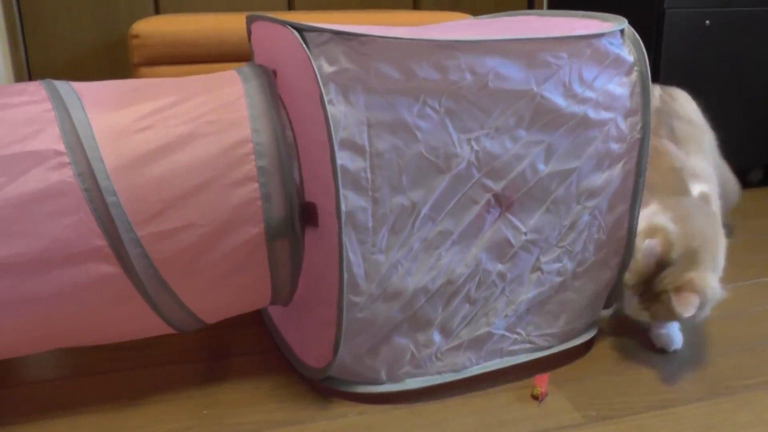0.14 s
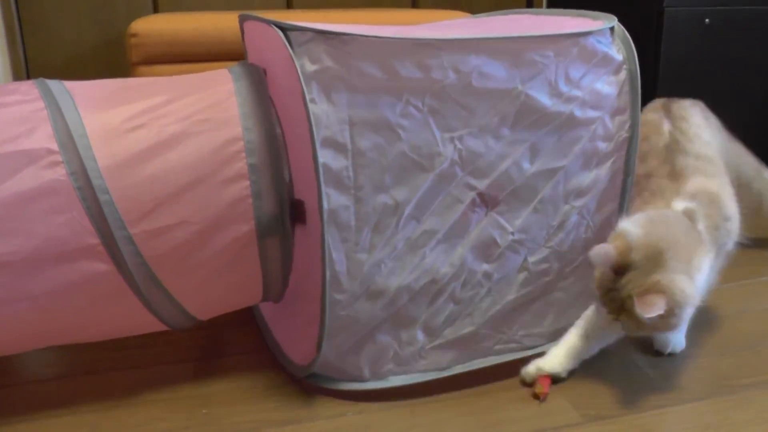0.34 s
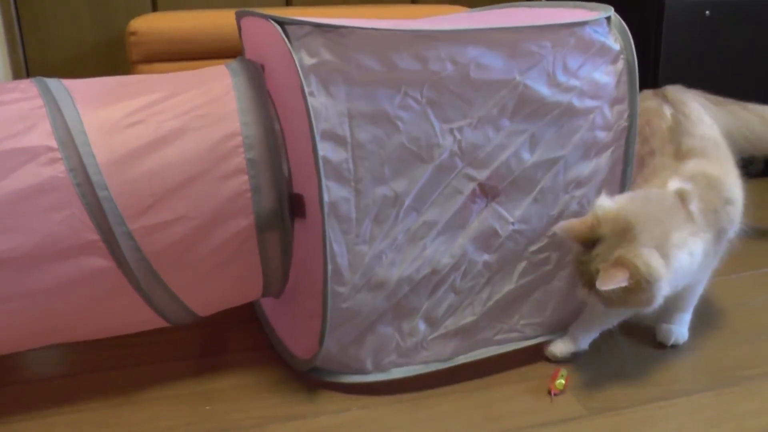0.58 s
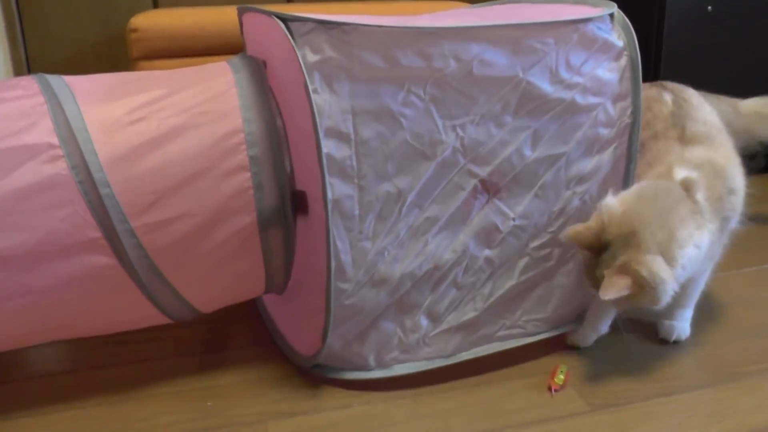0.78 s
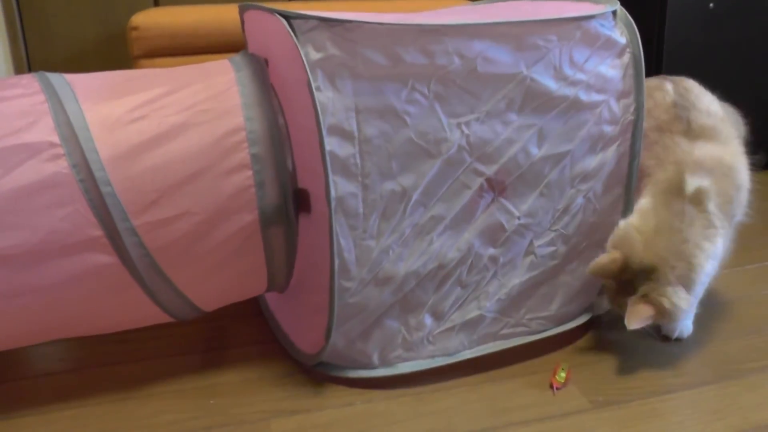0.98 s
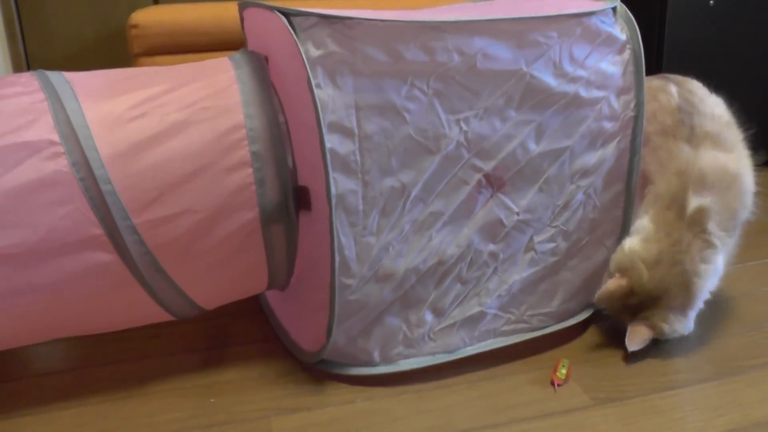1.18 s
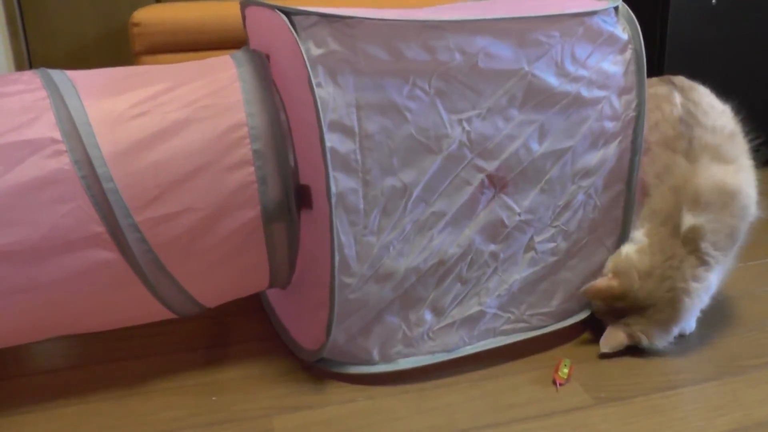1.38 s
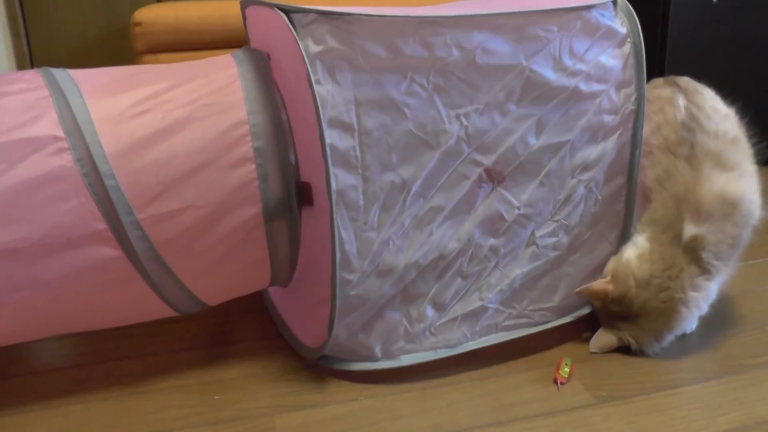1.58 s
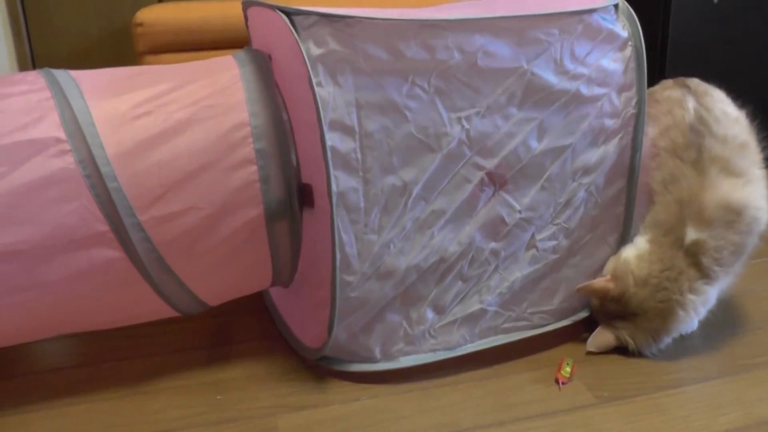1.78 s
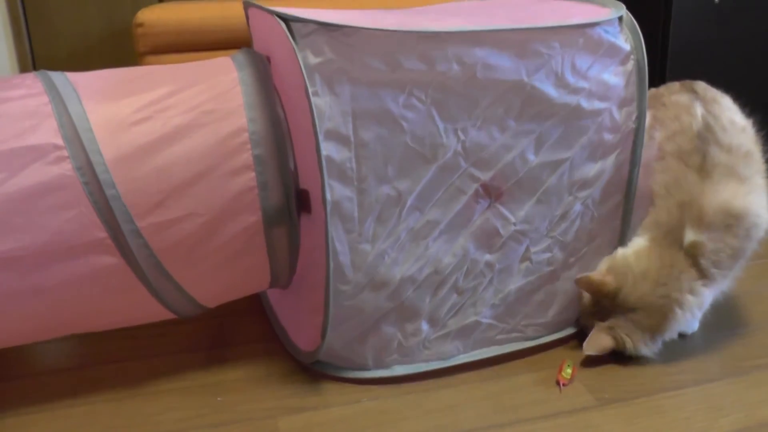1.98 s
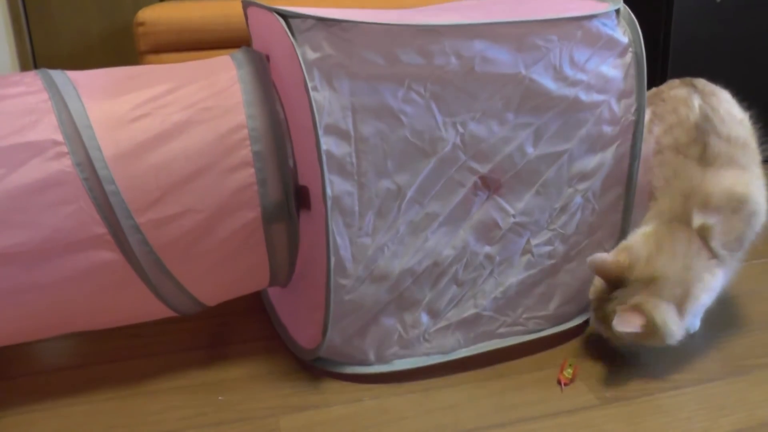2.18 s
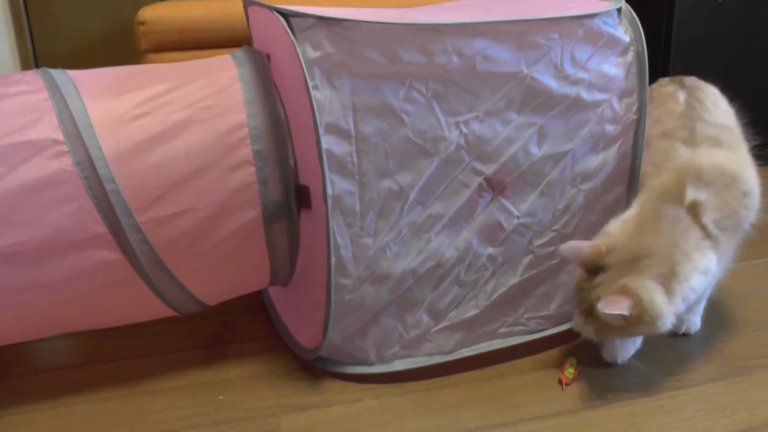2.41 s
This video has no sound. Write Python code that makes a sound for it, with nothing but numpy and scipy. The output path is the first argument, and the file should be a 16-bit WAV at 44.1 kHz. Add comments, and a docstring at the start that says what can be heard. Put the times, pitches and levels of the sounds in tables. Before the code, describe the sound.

A cat jostles a fabric play cube, heard close by. At about 0.2 seconds, fur and a paw swish across the cloth with a brief, ringing scrape. From 0.4 seconds the cube knocks quickly and unevenly on floorboards, loudest at first and fading by 1.3, with tiny cloth snaps. Two faint taps and softer swishes come between 1.7 and 2.4 seconds. The quiet room hums faintly throughout.

```python
"""A swish of fur on cloth, then wooden knocks: a cat brushes past a thin fabric play cube.
The first stroke sets two cloth panels singing; a paw jolts the cube, whose frame knocks and
rocks on the floorboards. The taut cloth snaps lightly, and softer swishes follow near the end.
Heard from close by on a stereo microphone, in a quiet room with a faint hum."""
import sys
import numpy as np
from scipy import signal
from scipy.fft import rfft, irfft
from scipy.io import wavfile
from scipy.ndimage import uniform_filter1d

SR = 44100
rng = np.random.default_rng(int(sys.argv[2]) if len(sys.argv) > 2 else 0)


def transcribe(signal):
    """Save signal, clipped to [-1, 1], as a 16-bit WAV file at the path in sys.argv[1]."""
    frames = np.atleast_2d(signal).T
    limited = np.clip(frames, -1, 1)
    pcm = np.round(limited * 32767).astype(np.int16)
    wavfile.write(sys.argv[1], SR, pcm)


N = 108045

# frame on the floor: t/s, relative level/dB at each of KNOCK_COLOUR_HZ, relative tick level/dB
KNOCKS = [(0.358, -56, -42.5, -58, -55, -62, -34.5, -65), (0.387, -44, -46, -45, -62, -63, -29.5, -77),
          (0.4376, -28, -31.5, -17.5, -33.5, -40.5, -45, -54), (0.464, -40.5, -38, -55, -45, -61, -54, -79),
          (0.533, -32.5, -47, -37, -57, -72, -39.5, -68), (0.543, -34, -50, -42, -50, -60, -50, -79),
          (0.591, -30, -35, -32.5, -31.5, -47.5, -33, -58),
          (0.6808, -34, -33.5, -33.5, -35.5, -38.5, -45, -51),
          (0.694, -32, -35, -28, -35.5, -44, -40.5, -59), (0.706, -34, -36, -41.5, -36.5, -71, -53, -85),
          (0.717, -46, -37.5, -63, -68, -54, -45.5, -72), (0.795, -37, -37.5, -36, -49, -61, -39, -74),
          (0.8569, -31.5, -38.5, -36.5, -35.5, -45, -49, -62.5),
          (0.867, -37, -47, -40, -44.5, -68, -46, -83), (0.925, -43, -43.5, -56, -52, -72, -47, -76),
          (0.963, -34, -42.5, -39.5, -48.5, -58, -50, -64), (0.986, -49, -58, -35.5, -44, -53.5, -55, -63),
          (1.03, -46, -47, -55, -66, -65, -62, -71), (1.070, -36, -51, -43, -49.5, -70, -57, -85),
          (1.117, -55, -70, -79, -67, -73, -60, -84), (1.162, -44, -56.5, -46, -62, -70, -60, -72),
          (1.207, -50, -60, -54, -92, -70, -47, -77), (1.245, -51, -48.5, -50, -65, -66, -67, -79),
          (1.307, -53.5, -64, -49.5, -68, -80, -70, -91), (1.34, -61.5, -83, -49.5, -79, -86, -70, -98),
          (1.746, -75, -66, -53.5, -63, -79, -60, -83), (2.056, -62, -58, -54, -54.5, -72, -65, -80)]
# points that shape a knock's spectrum: f/Hz
KNOCK_COLOUR_HZ = [520, 320, 760, 1150, 1900, 190]
# floorboard modes: f/Hz, gain/dB, t60/s
BOARD_MODES = [(183.3, -12, 0.23), (220, -12.5, 0.064), (321.7, 2, 0.19), (370.4, -9.5, 0.21),
               (480, -2.5, 0.062), (528.5, -1, 0.072), (575.5, -11, 0.29), (692, -1.5, 0.065),
               (771, -4.5, 0.053), (837.6, -5.5, 0.13), (1046, -8, 0.16), (1089, -4.5, 0.11),
               (1169, -3, 0.081), (1207, -3, 0.11), (1437, -5.5, 0.046), (1600, -5, 0.031),
               (1674, -8.5, 0.15), (1916, 0.5, 0.06), (2007, -2, 0.041), (2185, -9.5, 0.059),
               (2600, -8.5, 0.017), (3225, -9.5, 0.034)]
# stereo width of the knocks: f/Hz, side against mid/dB
KNOCK_WIDTH = [(250, -20), (700, -14), (1200, -6), (2400, -10), (8000, -4)]
# low, middle, high and top bands of the cloth: lower f/Hz, upper f/Hz
CLOTH_BANDS = [(300, 900), (900, 2400), (2500, 7500), (8000, 15000)]
# left-right likeness of each cloth band
CLOTH_LIKENESS = [0.88, 0.8, 0.7, 0.3]
# fur on cloth, one list a stroke: t/s, level/dB in each cloth band
SWISHES = [
    [(0.18, -82, -74, -73, -85), (0.197, -72, -56.5, -57, -60), (0.215, -55.5, -50, -51.5, -55),
     (0.243, -56, -54.5, -52, -50.5), (0.265, -51, -55, -58, -52.5), (0.338, -61.5, -66, -67, -52.5),
     (0.38, -60, -68, -68, -85)],
    [(1.84, -89, -96, -103, -76), (1.898, -82, -78, -74.5, -65.5), (2.05, -58.5, -63, -66, -55.5),
     (2.24, -90, -90, -82.5, -75.5)],
    [(2.26, -68, -97, -91, -92), (2.292, -89, -69.5, -71, -84), (2.336, -71, -66.5, -75, -73),
     (2.4, -83, -105, -100, -97)],
]
# rustle as the cube rocks: t/s, high band level/dB, top band level/dB
RUSTLE = [(0.381, -69.5, -67), (0.59, -81.5, -71.5), (0.884, -76, -68), (1.168, -82.5, -74),
          (1.648, -84.5, -75.5), (1.84, -96, -81)]
# cloth panel resonances: f/Hz, width/Hz
PANELS = [(1160, 110), (1930, 130)]
# paw scraping the panels: t/s, lower panel level/dB, upper panel level/dB
SCRAPE = [(.183, -86, -75), (0.201, -57, -50.5), (0.214, -50, -50.5), (.23, -43.5, -51),
          (0.256, -57.5, -57), (0.349, -64, -85)]
# cloth snaps: t/s, relative level/dB, f/Hz
SNAPS = [(0.3643, -40, 6860), (0.8388, -49.5, 6600), (1.2173, -55, 4000), (2.172, -49, 7900)]
# reverberation of the room: f/Hz, t60/s
ROOM_DECAY = [(250, 0.27), (800, 0.35), (2000, 0.39), (6000, 0.2)]
# room tone spectrum: f/Hz, relative level/dB
TONE_SPECTRUM = [(30, -3), (74, -10), (146, 4), (240, -6), (303, -0.5), (350, -3.5), (694, -8), (1390, -16),
                 (1720, -14), (2430, -25.5), (3500, -28), (5000, -29), (9000, -24.5), (15600, -20)]
# swell of the low room tone: t/s, gain/dB
TONE_SWELL = [(0, 2), (.15, 6.5), (.5, -1.5), (1.5, -0.2), (2.1, -0.5), (2.45, -3)]
# stereo image of the room tone: f/Hz, left-right likeness
TONE_LIKENESS = [(60, 0.93), (180, 0.85), (550, 0.66), (1650, 0.97), (4970, 0.91), (15000, 0.042)]
# microphone housing: f/Hz, gain/dB
MIC_RESPONSE = [(3000, 1.07), (4000, 1), (4450, -2.5), (5300, 3.5), (6800, 3.5), (7650, -10.5),
                (8600, -2.5), (12500, -5.5), (15600, -14)]
# microphone port balance: f/Hz, left minus right/dB
MIC_BALANCE = [(60, 0), (1500, 0), (15000, -1)]

RISE_CYCLES, SCATTER_DB, DETUNE = 1.8, 2.0, 0.007  # a mode's build-up; its spread from knock to knock
THUD_SHARE, THUD_T60_CYCLES = 0.57, 32.3  # the part of each mode that the resting frame damps
CHATTER_DEPTH, CHATTER_S = 0.45, 0.016  # the loose frame roughens each ring
TICK_GAIN_DB, TICK_T60_S, TICK_SPLIT_HZ = 4, 0.038, 9300
GRAINS_PER_S, GRAIN_SPREAD_DB, GRAIN_SHARE = 3000, 3.5, 0.49
SNAP_REACH_HZ, SNAP_T60_S = 3000, 0.028
REVERB_DB, TONE_DB, HUM_DB = -5.5, -62.5, -72
MIC_LIMIT_HZ = 15700


def frame_knocks():
    """Each knock rings the boards with its own colour, damped at first and roughened, plus a bright tick."""
    out, t = np.zeros((2, N)), np.arange(SR // 4) / SR
    hz, mode_db, t60 = np.transpose(BOARD_MODES)[:, :, None]
    steps = np.arange(int(t[-1] / CHATTER_S) + 2) * CHATTER_S
    sides = np.array([[1], [-1]])
    for start, *colour_db, tick_db in KNOCKS:
        scatter, detune, phase, side_phase = rng.standard_normal((4, len(hz), 1))
        noise = rng.standard_normal((2, 2000))
        shake = np.array([np.interp(t, steps, row) for row in rng.standard_normal((len(hz), len(steps)))])
        level_db = at_hz(sorted(zip(KNOCK_COLOUR_HZ, colour_db)), hz) + mode_db + SCATTER_DB * scatter
        rise = np.sin(np.pi / 2 * np.minimum(t * hz / RISE_CYCLES, 1)) ** 2
        thud = THUD_SHARE * gain_of(-60 * t * hz / THUD_T60_CYCLES)
        ring = (1 - THUD_SHARE) * gain_of(-60 * t / t60)
        chatter = 1 + CHATTER_DEPTH * np.minimum(t / CHATTER_S / 2, 1) * shake
        envelope = gain_of(level_db) * rise * (thud + ring) * chatter
        angle = 2 * np.pi * (hz * (1 + DETUNE * detune) * t + phase)
        mid = envelope * np.sin(angle)
        side = envelope * gain_of(at_hz(KNOCK_WIDTH, hz)) * np.sin(angle + 2 * np.pi * side_phase)
        add(out, start, mid.sum(0) + sides * side.sum(0))
        tick = unit_rms(band(noise, 2040, TICK_SPLIT_HZ) + 0.67 * band(noise, TICK_SPLIT_HZ, 21000))
        tick *= gain_of(tick_db + TICK_GAIN_DB - 60 * t[:2000] / TICK_T60_S)
        add(out, start, tick[0] + sides * gain_of(KNOCK_WIDTH[-1][1]) * tick[1])
    return out


def cloth_swishes():
    """Fur rubs the cloth: dense fibre grains over smooth hiss, in four bands that follow the strokes."""
    out = np.zeros((2, N))
    sizes = gain_of(GRAIN_SPREAD_DB * np.minimum(rng.exponential(1, N), 5))
    catches = rng.random(N) < GRAINS_PER_S / SR
    grains = unit_rms(sizes * catches) * rng.choice([-1., 1.], (2, N))
    friction = GRAIN_SHARE * grains + (1 - GRAIN_SHARE) * rng.standard_normal((2, N))
    for k, (lo_hz, hi_hz) in enumerate(CLOTH_BANDS):
        envelope = sum(contour(stroke, k + 1) for stroke in SWISHES)
        if k > 1:  # only the upper two bands rustle
            envelope += contour(RUSTLE, k - 1)
        out += envelope * unit_rms(band(stereo(*friction, CLOTH_LIKENESS[k]), lo_hz, hi_hz))
    return out


def paw_scrape():
    """The first stroke sets two panels of the cloth singing."""
    return sum(contour(SCRAPE, k + 1) * resonant_noise(hz, width_hz, CLOTH_LIKENESS[1])
               for k, (hz, width_hz) in enumerate(PANELS))


def cloth_snaps():
    """The taut cloth gives tiny bright snaps, each a fast-dying burst of noise."""
    out, t = np.zeros(N), np.arange(1500) / SR
    for start, db, hz in SNAPS:
        noise = band(rng.standard_normal(len(t)), hz - SNAP_REACH_HZ / 2, hz + SNAP_REACH_HZ)
        add(out, start, gain_of(db - 10.5 - 60 * t / SNAP_T60_S) * unit_rms(noise))
    return out


def room_reverb(x):
    """Sparse reflections come back to the microphone, each band dying at its own speed."""
    taps = np.zeros((2, SR // 2))
    slots = np.arange(200, SR // 2 - 20, 20)
    delays = slots + rng.integers(0, 20, (2, len(slots)))
    np.put_along_axis(taps, delays, rng.choice([-1., 1.], delays.shape), 1)
    hz, t, spectra = signal.stft(stereo(*taps, likeness=0.93), SR, nperseg=256)
    decay = gain_of(-60 * t / at_hz(ROOM_DECAY, hz)[:, None])
    tail = signal.istft(spectra * decay, SR, nperseg=256)[1]
    tail /= np.linalg.norm(tail[0])
    return gain_of(REVERB_DB) * signal.fftconvolve(x[None], tail, axes=1)[:, :N]


def room_tone():
    """The quiet room behind the cat: slightly patchy noise whose low part swells slowly."""
    frames, hz = N // 256 + 5, np.fft.rfftfreq(1024, 1 / SR)[:, None]
    mid_re, mid_im, side_re, side_im, patches = rng.standard_normal((frames, 513, 5)).T
    noise = stereo(mid_re + 1j * mid_im, side_re + 1j * side_im, at_hz(TONE_LIKENESS, hz))
    patches_db = 1.1 * unit_rms(uniform_filter1d(uniform_filter1d(patches, 8, 0), 10, 1))
    swell_db = np.interp(np.arange(frames) * 256 / SR, *np.transpose(TONE_SWELL)) / (1 + (hz / 1030) ** 2)
    spectra = noise * gain_of(at_hz(TONE_SPECTRUM, hz) + patches_db + swell_db)
    return gain_of(TONE_DB) * unit_rms(signal.istft(spectra, nperseg=1024, noverlap=768)[1][:, :N])


def faint_hum():
    """A narrow band of noise wavers in the centre of the image."""
    return gain_of(HUM_DB) * resonant_noise(hz=352.5, width_hz=8.8, likeness=1)


def gain_of(db):
    return 10 ** (np.asarray(db) / 20)


def unit_rms(x):
    return x / np.sqrt(np.mean(x ** 2) + 1e-20)


def at_hz(points, hz):
    """Table value on a log-frequency axis."""
    f, value = np.transpose(points)
    return np.interp(np.log(hz + 1), np.log(f + 1), value)


def contour(table, column):
    """Gain over time from one level column, silent outside the table's span."""
    columns = np.transpose(table)
    return gain_of(np.interp(np.arange(N) / SR, columns[0], columns[column], left=-150, right=-150))


def add(mix, start_s, sound):
    part = mix[..., round(start_s * SR):][..., :sound.shape[-1]]
    part += sound[..., :part.shape[-1]]


def band(x, lo_hz, hi_hz):
    return signal.sosfilt(signal.butter(3, [lo_hz, hi_hz], "band", fs=SR, output="sos"), x)


def stereo(mid, side, likeness):
    """Left and right from mid and side; a likeness of 1 is mono."""
    mid, side = np.sqrt((1 + likeness) / 2) * mid, np.sqrt((1 - likeness) / 2) * side
    return np.array([mid + side, mid - side])


def resonant_noise(hz, width_hz, likeness):
    """Stereo noise heard through one resonance."""
    noise = stereo(*rng.standard_normal((2, N)), likeness)
    offset = 2 * (np.fft.rfftfreq(N, 1 / SR) - hz) / width_hz
    return unit_rms(irfft(rfft(noise) / (1 + offset ** 2), N))


def scene():
    """The sound at the microphone position; only knocks and snaps feed the reverberation."""
    hits = frame_knocks() + cloth_snaps()
    hum = faint_hum()
    return hits + room_reverb(hits.mean(0)) + cloth_swishes() + paw_scrape() + room_tone() + hum


def record(dry):
    """The microphone: housing colour and port balance, then the band limit."""
    hz = np.linspace(0, SR / 2, 513)
    housing_db, balance_db = at_hz(MIC_RESPONSE, hz), at_hz(MIC_BALANCE, hz)
    colour = [signal.firwin2(511, hz, gain_of(housing_db + side * balance_db / 2), fs=SR)
              for side in (1, -1)]
    coloured = signal.oaconvolve(dry, np.array(colour), "same", axes=1)
    lowpass = signal.firwin(511, MIC_LIMIT_HZ, window=("kaiser", 9), fs=SR)
    return signal.oaconvolve(coloured, lowpass[None], "same")


dry = scene()
out = record(dry)
transcribe(out)
```